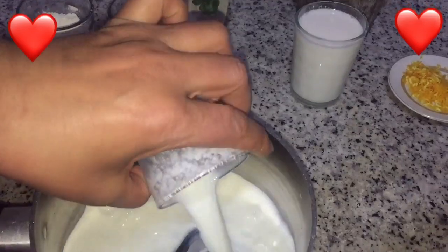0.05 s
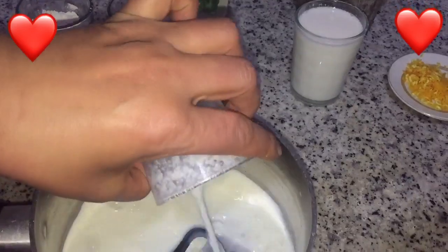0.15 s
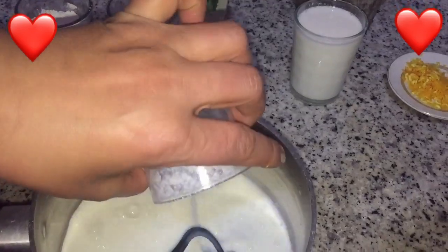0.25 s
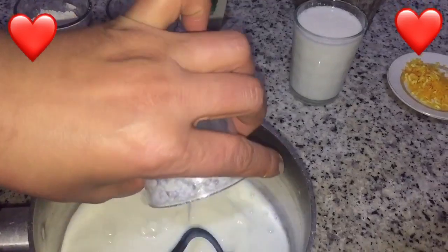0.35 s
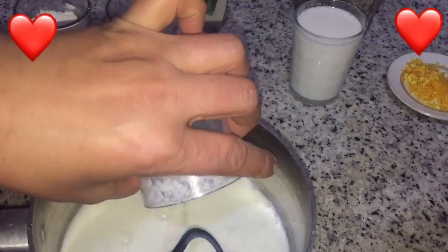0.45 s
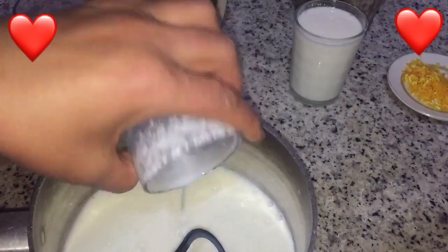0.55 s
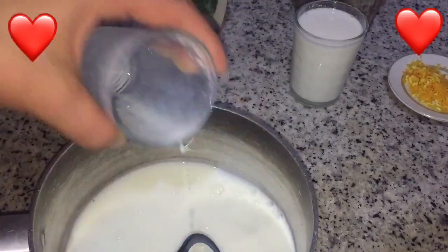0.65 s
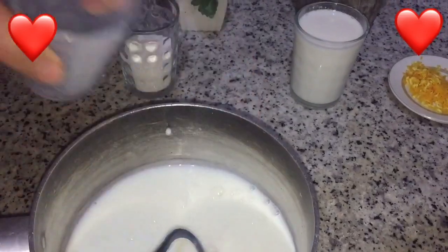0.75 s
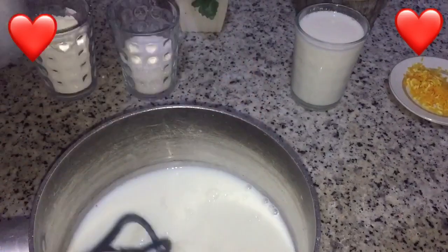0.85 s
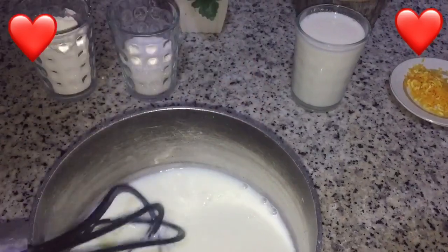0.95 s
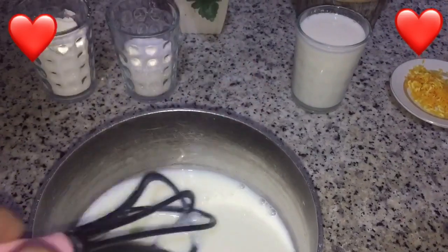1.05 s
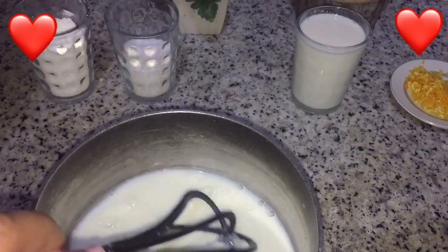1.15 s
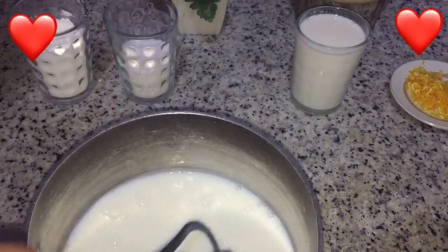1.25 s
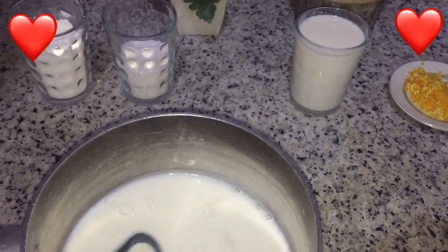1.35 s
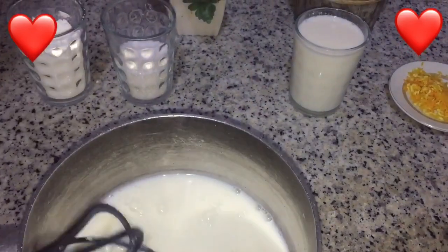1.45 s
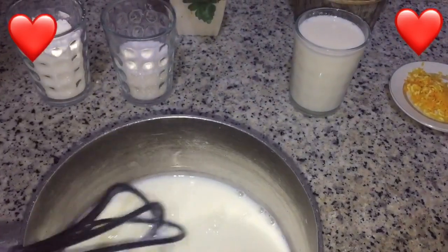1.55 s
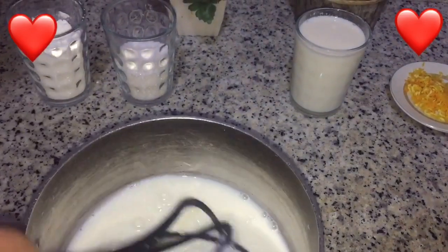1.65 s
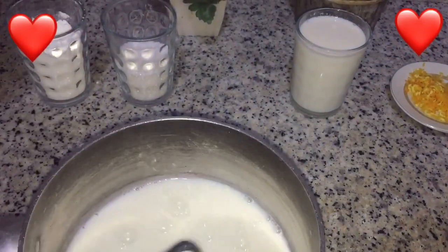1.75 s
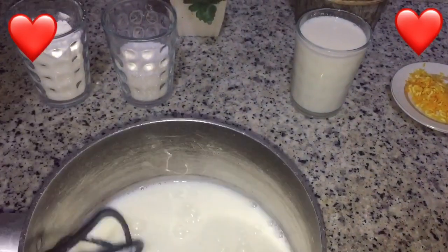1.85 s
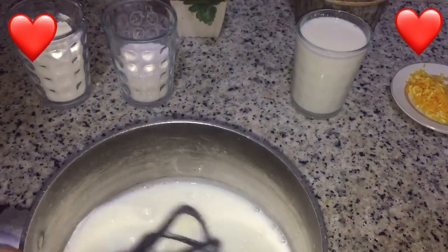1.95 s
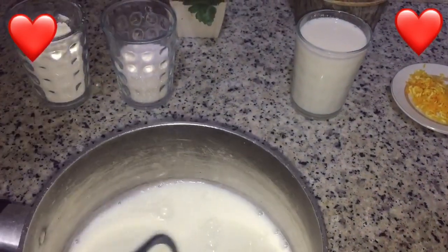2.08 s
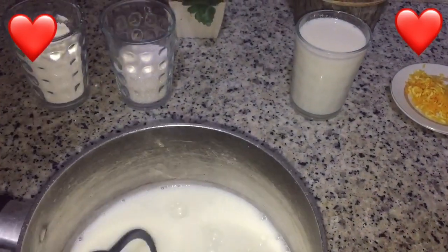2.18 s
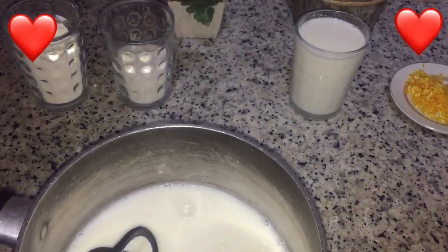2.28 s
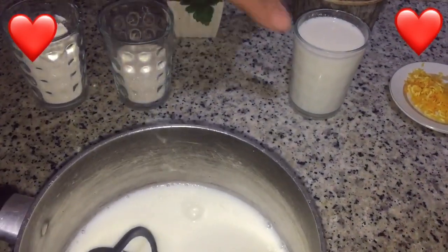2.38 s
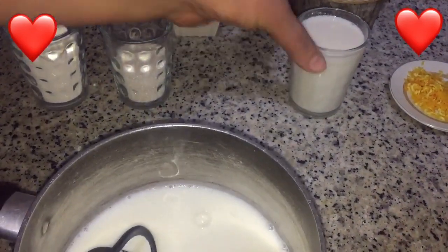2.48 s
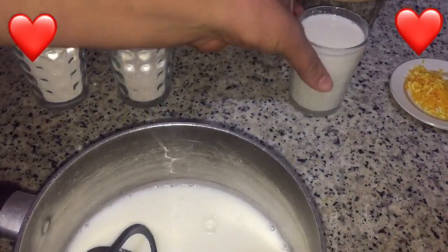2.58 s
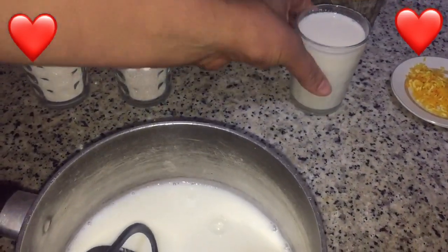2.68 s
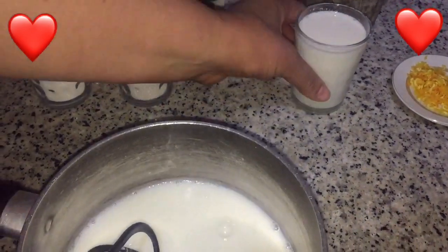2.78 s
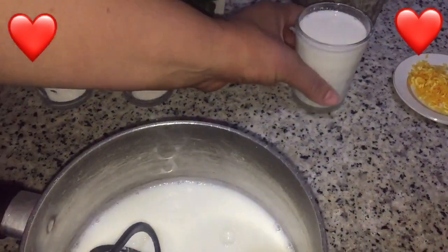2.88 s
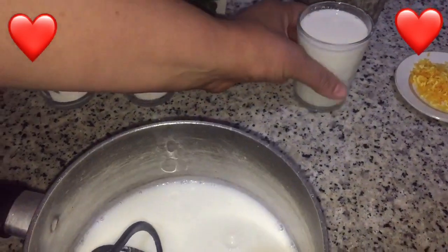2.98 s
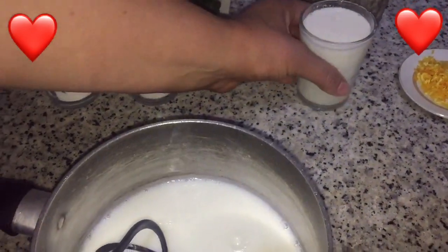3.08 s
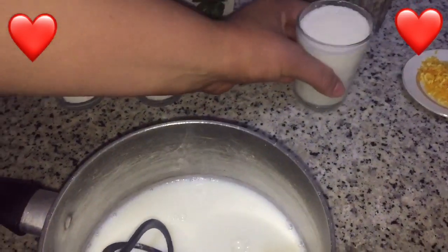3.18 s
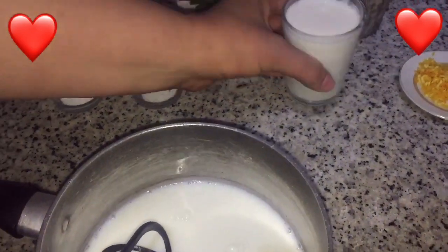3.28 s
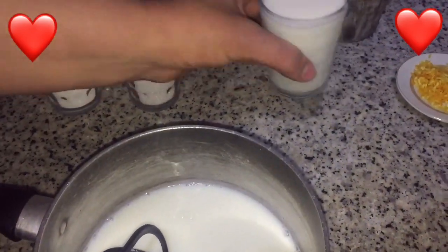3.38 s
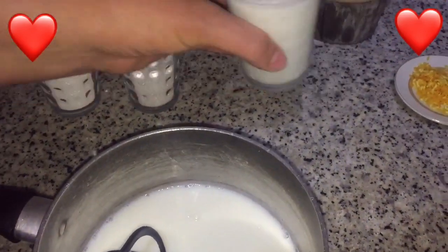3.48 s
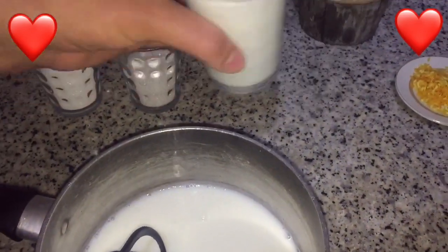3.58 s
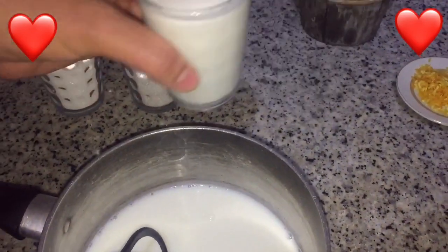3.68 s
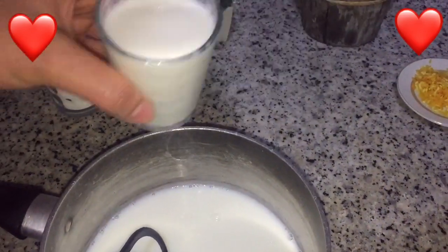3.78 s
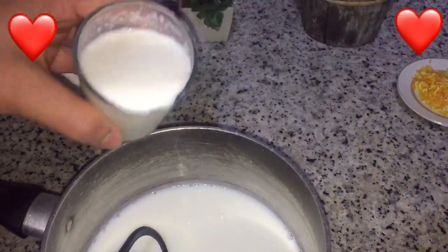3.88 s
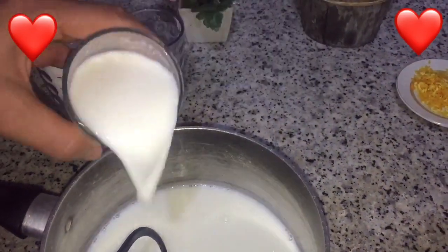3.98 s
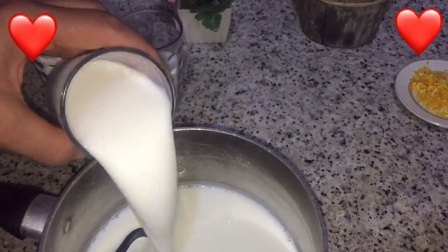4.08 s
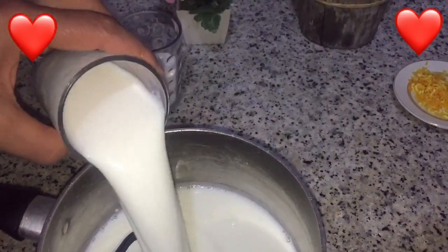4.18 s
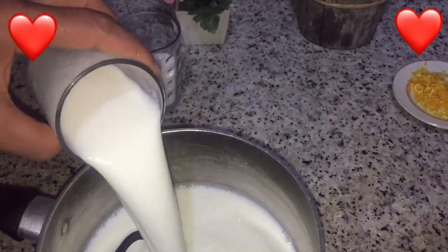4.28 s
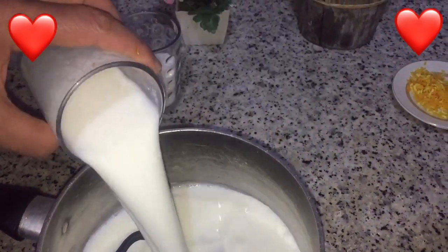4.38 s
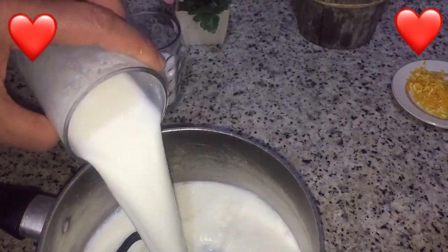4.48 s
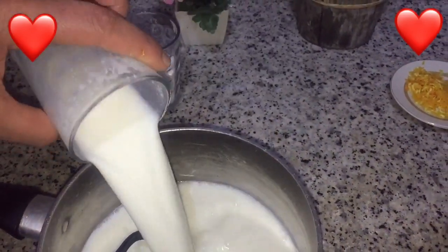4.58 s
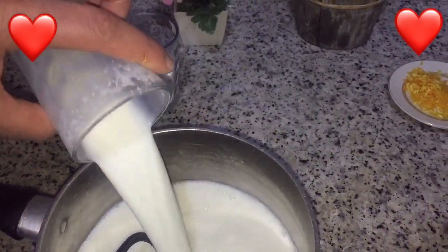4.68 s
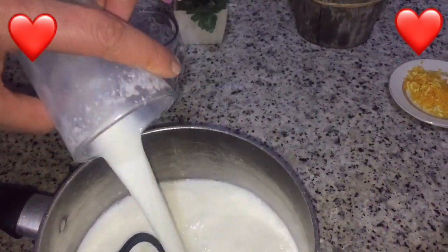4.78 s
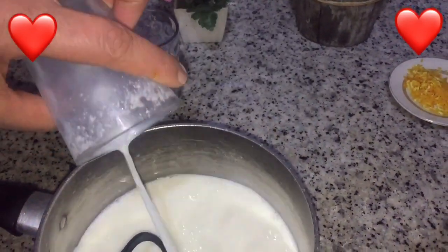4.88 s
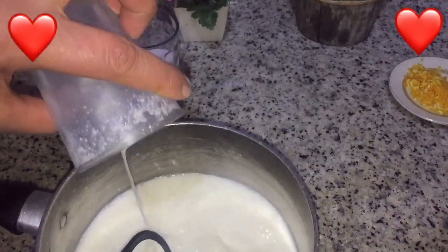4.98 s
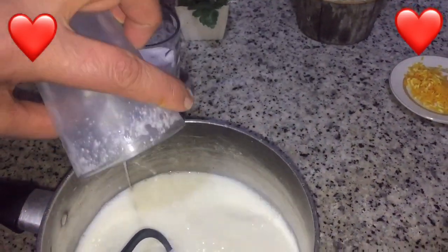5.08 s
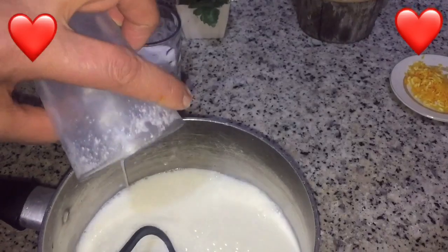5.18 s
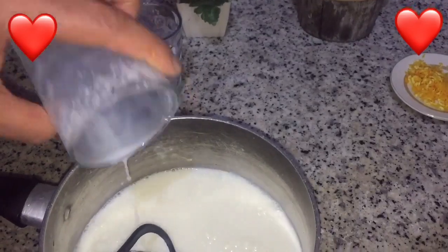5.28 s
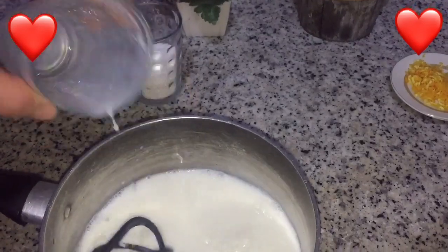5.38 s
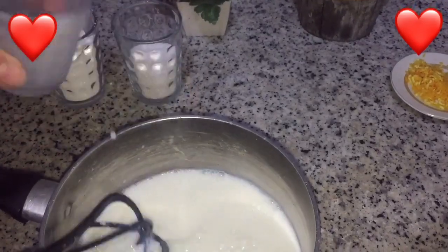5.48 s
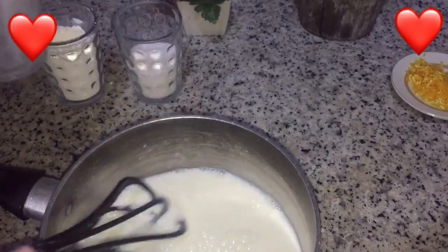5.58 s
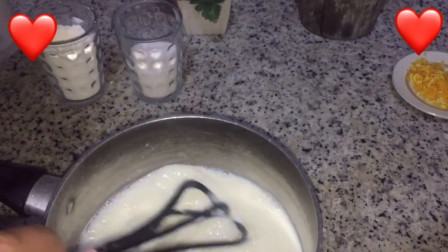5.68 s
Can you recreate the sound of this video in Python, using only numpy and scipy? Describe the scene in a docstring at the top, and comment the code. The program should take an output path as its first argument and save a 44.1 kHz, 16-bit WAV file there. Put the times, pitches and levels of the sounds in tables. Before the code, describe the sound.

Close kitchen sounds: the tail of a milk pour, whisk scraping in a metal pan, a knock and soft door thud, then a louder bubbling pour.

```python
"""Milk poured into a steel pan

Two glasses of milk go into a saucepan on a stone counter in a small kitchen: clouds of ringing bubbles (gliding
decaying sines), splash clicks, spray and gurgle, then plinking drops. Between the pours and after the second
a whisk scrapes (clicks through pan modes) and taps (struck modes). A hard knock and a cupboard door are
struck modes plus decaying noise bands; the next glass slides (resonated noise) and ticks. A fridge hums."""
import sys
import numpy as np
from scipy import signal
from scipy.fft import rfft, irfft
from scipy.io import wavfile

SR = 44100
rng = np.random.default_rng(int(sys.argv[2]) if len(sys.argv) > 2 else 0)


def to_wav(sig):
    """Store sig (one row per channel, or 1-D mono) as 16-bit WAV at the path in sys.argv[1].

    Samples outside -1..1 are clipped; the rate is SR.
    """
    pcm = np.clip(np.atleast_2d(sig), -1, 1) * 32767
    pcm = np.round(pcm).astype(np.int16)
    wavfile.write(sys.argv[1], SR, pcm.T)  # frames by channels


N = 253045
T = np.arange(N) / SR
FREQS = np.fft.rfftfreq(N, 1 / SR)

# Table levels are relative: each layer applies its own trim gain.
# loud single bubbles, low and high: [t/s, f/Hz, level/dB]
LOUD_BUBBLES = [(0.015, 1306, -37), (0.037, 1400, -34.5), (0.064, 1355, -35), (0.107, 4730, -30),
                (0.122, 6050, -30), (0.135, 1500, -34.5), (0.147, 4170, -30.5), (0.175, 5400, -37),
                (4.266, 4540, -40), (4.29, 5760, -29.5), (4.301, 2500, -34), (4.342, 1860, -32),
                (4.382, 2660, -28), (4.432, 1260, -26.5), (4.449, 1460, -25), (4.454, 6600, -27),
                (4.575, 1880, -26.5), (4.672, 1177, -34), (4.756, 2440, -24), (4.781, 865, -38.5),
                (4.812, 2480, -31), (4.961, 3090, -30.5), (5.001, 1470, -31.5), (5.096, 1780, -30),
                (5.114, 2500, -31), (5.149, 2990, -38)]
# modes of the pan wall, damped by the milk: [f/Hz, level/dB, t60/s]
PAN_WALL = [(854, -1.5, 0.24), (1243, 4.5, 0.25), (1317, 2.5, 0.13), (1670, 0, .13), (1930, 4.5, 0.042),
            (2020, 0, 0.083), (2420, -5.5, 0.055), (2680, -12, .1), (3043, -2.5, .1), (3200, -10.5, .08),
            (4060, -3.5, 0.082), (4620, -18, 0.067), (5475, -15.5, .1), (6030, -14, .13), (6360, -13, .11),
            (7100, -16.5, 0.085)]
STROKE_ATTACK_S, STROKE_RELEASE_S = 0.088, 0.25  # whisk strokes


def undb(db):
    """Decibels to gain."""
    return 10 ** (np.asarray(db) / 20)


def unit(x):
    """Scale to rms 1."""
    return x / (np.std(x) + 1e-12)


def add(out, s, x):
    """Mix x into out from time s."""
    i = int(s * SR)
    out[i:i + len(x)] += x[:max(N - i, 0)]


def colour(x, points):
    """Filter by a (Hz, dB) spectrum."""
    hz, db = np.transpose(points)
    gain = undb(np.interp(np.log(FREQS + 1), np.log(hz), db))
    return irfft(rfft(x) * gain, N)


def band(x, lo_hz, hi_hz, order=2):
    """Causal band-pass."""
    sos = signal.butter(order, [lo_hz, min(hi_hz, .48 * SR)], "band", fs=SR, output="sos")
    return signal.sosfilt(sos, x)


def resonate(x, hz, width):
    """One resonance, gain 1 at its centre."""
    return signal.lfilter(*signal.iirpeak(hz, hz / width, fs=SR), x)


def convolve(x, response):
    """Pass x through an impulse response."""
    return signal.fftconvolve(x, response)[:N]


def fade(t, t60):
    """Exponential decay, 60 dB down at t60."""
    return np.exp(-np.log(1000) * t / t60)


def envelope(start, length, db, attack_s, release_s):
    """Gain over time: swells by 64 dB up to start, holds db for length, then falls by 64 dB."""
    out = np.zeros(N)
    live = (T > start - attack_s) & (T < start + length + release_s)
    before = np.maximum(start - T[live], 0) / attack_s
    after = np.maximum(T[live] - start - length, 0) / release_s
    out[live] = undb(db) * fade(before + after, 0.94)
    return out


def walk(rate):
    """Random wandering through `rate` knots per second, rms 1."""
    knots = rng.standard_normal(int(T[-1] * rate) + 2)
    return unit(np.interp(T * rate, np.arange(len(knots)), knots))


def ring(modes, scatter_db=0):
    """Struck modes of alternating sign; the place of the blow scatters their strengths."""
    t, out = T[:SR], 0
    for k, (hz, db, t60) in enumerate(modes):
        gain = (-1) ** k * undb(db + scatter_db * rng.standard_normal())
        out = out + gain * np.sin(2 * np.pi * hz * t) * fade(t, t60)
    return out


def dense_ring(table):
    """Dense overlapping modes as half-octave noise bands, each with its own decay."""
    hz, db, t60 = np.transpose(table)
    out, t = 0, T[:SR]
    for f in np.geomspace(40, 14000, 18):
        noise = unit(band(rng.standard_normal(SR), f / 2 ** (1 / 4), f * 2 ** (1 / 4), order=3))
        gain = undb(np.interp(np.log(f), np.log(hz), db)) * min(f / hz[0], 1) ** 2
        out = out + gain * noise * fade(t, np.interp(np.log(f), np.log(hz), t60))
    return out


def clicks(rate, spread_db):
    """Random impulses of uneven size and either sign, `rate` per second on average."""
    size = undb(spread_db * np.minimum(rng.exponential(size=N), 4))
    return (rng.random(N) < rate / SR) * size * rng.choice([-1, 1], N)


def snap(lo_hz, hi_hz, t60):
    """The brief crackle of a liquid film breaking: band-passed decaying noise."""
    t = T[:SR // 12]
    return band(rng.standard_normal(len(t)) * fade(t, t60), lo_hz, hi_hz, order=4)


def bubble(hz, t60, rise, hold=1.2):
    """A trapped bubble rings; its pitch glides by the fraction `rise` over t60, and hold > 1 speeds up its decay."""
    t = T[:int(t60 * SR) + 2]
    return np.sin(2 * np.pi * hz * (t + rise * t * t / (2 * t60))) * fade((t / t60) ** hold, 1)


def chirp(hz, t60, rise, hold):
    """A single clear bubble whose neck closes smoothly."""
    tone = bubble(hz, t60, rise, hold)
    return tone * (1 - np.exp(-T[:len(tone)] / 0.00025))  # closing time constant, s


def bubble_cloud(flow, count, lo_hz, hi_hz, cycles, rise, spread_db):
    """Bubbles of random size born while the milk flows, at rms 1 over that time."""
    out, flowing = np.zeros(N), np.flatnonzero(flow > 1e-6)
    for when, size, strength, damping in rng.random((count, 4)):
        hz = lo_hz * (hi_hz / lo_hz) ** size
        loud = undb(-spread_db * np.log(.04 + strength))
        t60 = cycles * (.3 + damping) / np.sqrt(hz * lo_hz)
        add(out, T[flowing[int(when * len(flowing))]], loud * bubble(hz, t60, rise))
    return out / np.std(out[flowing])


def in_pan(x):
    """The air in the pan above the milk resonates with whatever sounds there."""
    # air resonances: [f/Hz, width/Hz, level/dB]
    cavity = [(1254, 54, 0), (1480, 330, -8.5), (2000, 150, -2), (2350, 66, 6), (4000, 290, -2)]
    return x + sum(undb(db) * resonate(x, hz, width) for hz, width, db in cavity)


def off_walls(x, db):
    """Quick echoes between the steel walls of the pan, as decaying noise."""
    t = T[:SR // 10]
    echoes = band(rng.standard_normal(len(t)), 800, 13000) * fade(t, 0.033) * (t > .001)
    return x + undb(db) * convolve(x, echoes / np.linalg.norm(echoes))


def background():
    """Still kitchen air as coloured noise; fridge hum as narrow noise bands, which waver."""
    # air spectrum: [f/Hz, level/dB]
    air = [(25, -24.5), (50, -16), (80, -4), (140, -14), (300, -12.5), (500, -18.5), (1300, -22),
           (5000, -31.5), (10000, -36), (16000, -38.5)]
    # fridge hum: [f/Hz, width/Hz, level/dB]
    hum_bands = [(78.2, 2.7, -67.5), (183, 4.7, -77), (286, 16, -73.5)]
    hum = sum(undb(db) * unit(resonate(rng.standard_normal(N), hz, width)) for hz, width, db in hum_bands)
    return undb(-65.5) * unit(colour(rng.standard_normal(N), air)) + hum


def door():
    """A cupboard door meets its frame softly; the panel booms and rattles, and each contact chatters."""
    # panel modes: [f/Hz, level/dB, t60/s]
    panel = [(42.1, -8, .45), (55.5, -4.5, 0.25), (90.3, -1.5, 1), (130, -20, 0.82), (182.7, 0.5, 0.37),
             (276.8, -11.5, 0.7), (321, -3, 0.27), (394.5, -9.5, 0.3), (462.6, -7.5, 0.42),
             (659, -0.5, 0.21), (873, 10.5, 0.077), (910, -7, 0.37), (960, -15, 0.26), (1087, -8, 0.15)]
    # rattle bands: [f/Hz, level/dB, t60/s]
    rattle_bands = [(50.4, -0.5, 0.93), (160, 6, 0.44), (382, -3.5, 0.61), (1000, -6, 0.57),
                    (1480, -5.5, 0.5), (2500, -16.5, 0.39), (3970, -25.5, 0.25), (6900, -64, 0.18)]
    # contacts with the frame: [t/s, level/dB]
    blows = [(2.581, 6.5), (2.656, 5), (2.712, 2)]
    out, push = np.zeros(N), 1 - fade(T[:SR], 0.025)
    rattle = dense_ring(rattle_bands) * push
    add(out, blows[0][0], undb(-27.5) * ring(panel) * push + undb(-36.5) * rattle)
    chatter = band(rattle, 570, 2700, order=1) * fade(T[:SR], 0.052)
    for s, db in blows:
        add(out, s, undb(db - 38) * chatter)
    return out


def knock():
    """A hard thing lands on its edge, then flat: a noise crack for each, modes from the first."""
    # modes: [f/Hz, level/dB, t60/s]
    modes = [(193, -23.5, 0.45), (290.3, -15, 0.37), (492, -25, 0.099), (565, -12, 0.065),
             (685, -13, 0.082), (770, -11, .14), (859, 1, 0.081), (960, -1, 0.12), (1000, -14.5, .12),
             (1427, -1.5, 0.064), (1790, -12.5, 0.05), (2104, -0.5, .08), (2051, -1.5, 0.031),
             (2513, -0.5, .08), (3060, -16, .1), (3760, -21.5, 0.031), (9000, -36.5, .25)]
    # crack bands: [f/Hz, level/dB, t60/s]
    crack = [(150, -21, 0.1), (405, -10.5, 0.11), (900, -0.5, 0.05), (2460, 1, 0.061), (4000, -5.5, 0.044),
             (5950, -18.5, 0.019), (8950, -34, .07), (15000, -46, .06)]
    # edge, then flat: [t/s, level/dB]
    blows = [(1.8478, -19.5), (1.854, -27.5)]
    out = np.zeros(N)
    for s, db in blows:
        add(out, s, undb(db) * dense_ring(crack))
    add(out, blows[0][0], undb(-17.0) * ring(modes) * (1 - fade(T[:SR], 0.0043)))
    return out


def glass():
    """The full glass squeaks and judders over the stone (resonated noise), then ticks as it is taken up."""
    # thin squeak, then low judder: [t/s, length/s, level/dB, f/Hz, width/Hz of each of two passes]
    slides = [(2.837, 0.303, -77, 3310, 250), (3.223, 0.1, -59, 287, 22)]
    # dry ticks as the fingers take up the glass: [t/s, level/dB]
    ticks = [(3.276, -46), (3.3095, -30.5)]
    # tick modes: [f/Hz, level/dB, t60/s]
    tick_modes = [(86, -13, 0.055), (740, -4.5, 0.015), (1530, -7, 0.013), (3380, 3, 0.0027),
                  (6940, -32, 0.0029)]
    out = np.zeros(N)
    for start, length, db, hz, width in slides:
        rub = resonate(resonate(rng.standard_normal(N), hz, width), hz, width)
        out += unit(rub) * envelope(start, length, db, attack_s=0.09, release_s=0.07)
    for s, db in ticks:
        add(out, s, undb(db) * ring(tick_modes))
    return out


def scraping():
    """Wires stick and slip on the steel; each mode of the wall is fed more or less strongly over time."""
    # strokes: [t/s, length/s, level/dB, high singing re stroke/dB]
    scrapes = [(1.041, 0.016, -54.5, -23.5), (1.249, 0.069, -54, -15), (1.493, 0.012, -58.5, -13),
               (1.563, 0.094, -57, -4), (1.672, 0.0062, -48, -16.5), (1.77, 0.063, -47, -13),
               (2.086, 0.045, -47.5, -17), (2.193, 0.1, -61.5, -15), (5.452, 0.081, -67, -0.5),
               (5.578, 0.088, -55, -8.5)]
    strokes = [envelope(*row[:3], STROKE_ATTACK_S, STROKE_RELEASE_S) for row in scrapes]
    force = sum(strokes)
    singing = sum(stroke * undb(row[3]) for stroke, row in zip(strokes, scrapes))
    slips = clicks(rate=2400, spread_db=2)
    modes = []
    for hz, db, _ in PAN_WALL[1:]:
        modes.append((hz, undb(db + 4 * walk(25)) * unit(resonate(slips, hz, 45 + hz / 100))))
    low = unit(band(sum(x for hz, x in modes if hz < 5000), 1050, 4200, order=3))
    high = unit(band(sum(x for hz, x in modes if hz >= 5000), 5000, 7800))
    grit = unit(band(slips, 1150, 3300, order=3))
    scrape = undb(-4) * (low + undb(-8.5) * grit) * force
    return (scrape + undb(-2.5) * high * singing) * undb(3.5 * walk(50))


def squeal():
    """One wire grips and slips, faster and faster, with an unsteady pitch, as the whisk slides to rest."""
    # squeals: [t/s, length/s, level/dB, start f/Hz, rise/(octave/s)]
    squeals = [(2.215, 0.025, -51.5, 1320, 2.7), (2.245, 0.0046, -50, 1531, 14)]
    out = np.zeros(N)
    for start, length, db, hz, octaves_per_s in squeals:
        glide = 2 ** np.clip(octaves_per_s * (T - start), -.5, .5)
        phase = 2 * np.pi * np.cumsum(hz * glide * (1 + .04 * walk(400))) / SR
        tone = np.sin(phase) + undb(-21.5) * np.sin(2 * phase)
        out += tone * envelope(start, length, db, STROKE_ATTACK_S, STROKE_RELEASE_S)
    return out * undb(3 * walk(150))


def whisk():
    """Wires scrape, tap the wall, bump the base and swirl the milk into bubbles."""
    # taps: [t/s, wall ring/dB, click/dB, base thump/dB]
    taps = [(1.023, -43.5, -43, -50.5), (1.568, -49, -28, -63.5), (1.574, -40.5, -35.5, -50),
            (1.593, -44, -34.5, -57.5), (1.613, -48.5, -40, -62.5), (1.691, -53, -51, -33),
            (2.084, -40, -58, -63), (2.127, -43, -50, -63), (5.604, -55.5, -51, -53.5)]
    # modes of the pan's base: [f/Hz, level/dB, t60/s]
    base = [(195, 1.5, 0.25), (275, -14.5, .17), (580, -21.5, 0.05)]
    # milk swirling round the whisk: [t/s, length/s, level/dB]
    swirls = [(1.33, 0.02, -54), (1.391, 0.025, -56)]
    out = scraping() + squeal()
    for s, ring_db, click_db, base_db in taps:
        click = unit(band(rng.standard_normal(SR), 1100, 7000, order=3)) * fade(T[:SR], 0.023)
        blow = undb(ring_db - 13.5) * ring(PAN_WALL, scatter_db=6.5)
        blow = blow + undb(click_db + 3.5) * click + undb(base_db) * ring(base)
        add(out, s, blow * (1 - fade(T[:SR], 0.007)))  # coated wires land softly
    stir = sum(envelope(*row, STROKE_ATTACK_S / 2, STROKE_RELEASE_S) for row in swirls)
    swirl = bubble_cloud(stir, count=110, lo_hz=465, hi_hz=1050, cycles=24, rise=.05, spread_db=0.0)
    return out + undb(-4.0) * stir * swirl


def drops():
    """Each drop slaps the surface, pinches off one clear bubble and leaves a fizzing crater; brief high pops."""
    # drops from the emptied glass: [t/s, f/Hz, level/dB, pitch glide/fraction, slap re level/dB]
    drips = [(0.198, 2830, -32.5, 0.65, -20.5), (0.365, 1807, -41.5, -0.013, -30),
             (0.411, 1670, -48.5, -0.1, -7), (0.448, 7720, -42.5, 0.26, -1), (0.472, 6500, -35, -0.12, -15),
             (0.509, 6780, -36, 0, -19), (0.538, 8270, -41.5, 0.17, -12), (5.2117, 4280, -24, -0.18, -1),
             (5.255, 1221, -24, -0.13, -5), (5.3062, 1210, -29.5, 0.47, -18),
             (5.501, 6120, -31.5, 0.34, -15)]
    # brief high ticks and pops, of a whisk tap, of the spray and of foam: [t/s, level/dB]
    pops = [(1.088, -50), (1.83, -43), (2.042, -51.5), (2.087, -38), (4.344, -27.5), (5.137, -38),
            (5.24, -43)]
    cycles_to_60_db, echo_s, echo_db = 22.6, .0046, -3  # echo: one reflection from a near surface
    out = np.zeros(N)
    for s, hz, db, rise, slap_db in drips:
        tone = chirp(hz, cycles_to_60_db / hz, rise, hold=2.32)
        tilt = np.sqrt(hz / 1000)  # higher drops echo and fizz less
        add(out, s, undb(db + 0.5) * tone)
        add(out, s + echo_s, undb(db + echo_db) * tone / tilt)
        add(out, s, undb(db + slap_db) * snap(1500, 16000, t60=0.0068))
        add(out, s, undb(db - 11) * snap(hz / 1.3, 1.6 * hz, t60=.06) / tilt)
    for s, db in pops:
        add(out, s, undb(db + 3.5) * snap(6500, 17000, t60=0.00508))
    return off_walls(out, db=-12)


def glugs():
    """Loud single bubbles pinch off with a crackle and ring; a few long-lived ones flutter and chirp as they surface."""
    # surfacing bubbles: [t/s, f/Hz, level/dB, t60/s, pitch rise/fraction]
    surfacing = [(0.184, 1424, -41, 0.07, 1), (4.885, 2560, -28, 0.11, 0.4),
                 (4.903, 2460, -27.5, 0.102, 0.22), (5.316, 1700, -42.5, 0.13, 1.0)]
    cycles_to_60_db = 40  # so small bubbles die sooner
    out, rising = np.zeros(N), np.zeros(N)
    for s, hz, db in LOUD_BUBBLES:
        add(out, s, undb(db - 2) * chirp(hz, cycles_to_60_db / hz, rise=0.1, hold=1.5))
        add(out, s, undb(db - 6) * snap(hz / 1.5, 2 * hz, t60=.03))
    for s, hz, db, t60, rise in surfacing:
        add(rising, s, undb(db - 2) * chirp(hz, t60, rise, hold=1.6))
    return off_walls(out + rising * (.6 + .7 * walk(300)), db=-10)


def pour():
    """The stream drags in unevenly clustered bubbles, surges at each loud one, splashes, sprays and gurgles."""
    # pours: [t/s, full flow/s, stream/dB, spray re stream/dB, low bubbles re stream/dB]
    pours = [(0.0, 0.19, -51.5, -16.5, 2.5), (4.35, 0.6, -39.5, -9.5, 0.5)]
    # bubble spectrum: [f/Hz, level/dB]
    bubble_sizes = [(500, -40), (900, -14.5), (1300, -2), (2500, -2.5), (4000, -3), (6500, -4.5),
                    (10000, -14), (16000, -6)]
    # the stream plunges deep: [t/s, length/s, level/dB]
    plunges = [(0.0, 0.015, -46), (4.433, 0.032, -35.5)]
    _, _, _, spray_db, low_db = np.transpose(pours)
    flows = np.array([envelope(*row[:3], attack_s=.2, release_s=.55) for row in pours])
    flow = flows.sum(0)
    # each loud bubble brings a burst of others
    surge = sum(envelope(s, 0, db - 14.5, attack_s=0.0095, release_s=0.054) for s, _, db in LOUD_BUBBLES)
    plunge = sum(envelope(*row, attack_s=0.033, release_s=0.38) for row in plunges)
    plunge = plunge + undb(-24.5) * flow  # any flow gurgles a little

    low = bubble_cloud(flow, count=1000, lo_hz=710, hi_hz=3295, cycles=27.0, rise=0.22, spread_db=3.5)
    low = low * undb(1.76 * walk(30))
    high = bubble_cloud(flow, count=3000, lo_hz=2580, hi_hz=15150, cycles=30.5, rise=0.081, spread_db=5)
    high = high * undb(2 * walk(45))
    splash = unit(band(clicks(rate=11000, spread_db=1.5), 540, 22000)) * undb(3.9 * walk(70))
    stream = low * (undb(low_db) @ flows + surge)
    stream = stream + (undb(2.5) * high + undb(-9.0) * splash) * (flow + surge)
    stream = undb(-4.5) * off_walls(in_pan(colour(stream, bubble_sizes)), db=-8.5)

    mist = bubble_cloud(flow, count=4000, lo_hz=6770, hi_hz=15600, cycles=38, rise=.03, spread_db=5.5)
    spray = undb(-5) * band(mist, 6200, 13500) * (undb(spray_db) @ flows)
    deep = bubble_cloud(plunge, count=700, lo_hz=73.6, hi_hz=327, cycles=22, rise=0.11, spread_db=-4)
    gurgle = undb(-8) * band(deep, 54, 295) * plunge
    return stream + spray + gurgle


def scene():
    """Near sounds are almost dry; the knock and the door fill the room more."""
    # kitchen reverberation: [f/Hz, level/dB, t60/s]
    kitchen = [(100, -16.5, 0.56), (313, -5.5, 0.66), (993, -0.5, 0.5), (2440, -2.5, 0.46),
               (6000, 4.5, 0.48), (15000, -3, .22)]
    milk, wires, hard, thud = pour() + glugs() + drops(), whisk(), knock(), door()
    room = dense_ring(kitchen) * (1 - fade(T[:SR], 0.007))  # reflections build up gradually
    bright = band(wires, 500, 9000, order=1)  # the small pan radiates little bass
    send = undb(-19.5) * milk + undb(-15) * bright + undb(-10.5) * hard + undb(-14.5) * thud
    wet = convolve(send, room / np.linalg.norm(room))
    return (milk + wires + hard + thud + glass() + wet + background())[None]


def record(dry):
    """A phone cuts the deepest bass and the top, and rounds the loudest peaks."""
    x = signal.sosfilt(signal.butter(8, 38, "high", fs=SR, output="sos"), dry)
    x = .55 * np.tanh(x / .55)
    return signal.sosfilt(signal.ellip(10, .2, 70, 16000, fs=SR, output="sos"), x)


dry = scene()
out = record(dry)
to_wav(out)
```